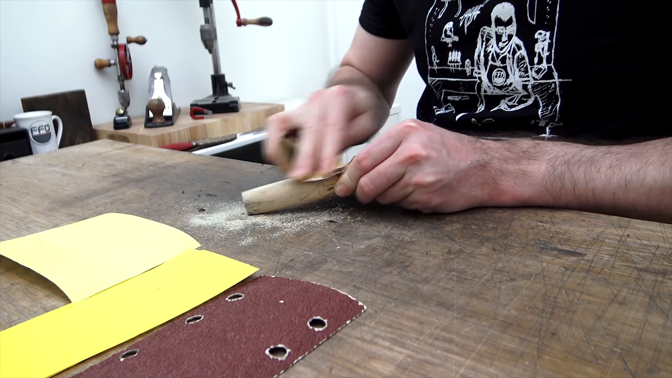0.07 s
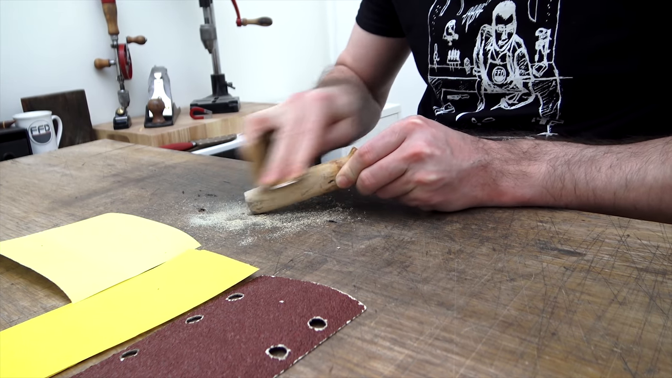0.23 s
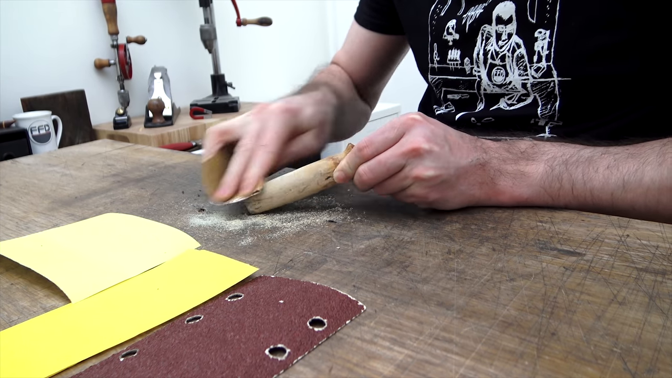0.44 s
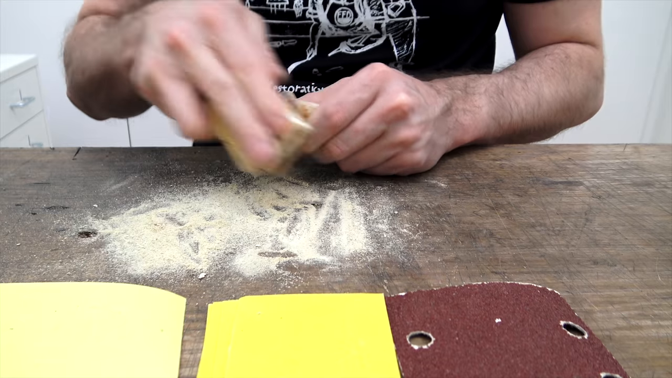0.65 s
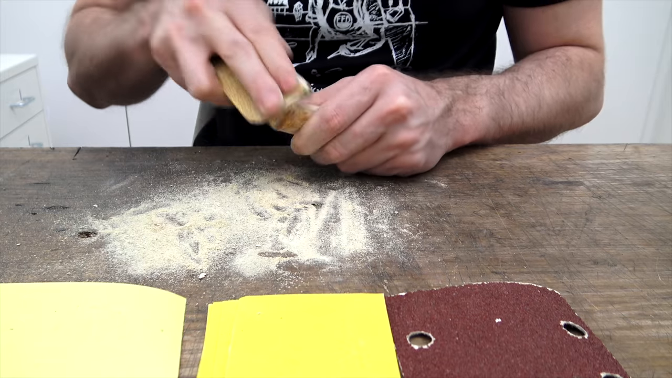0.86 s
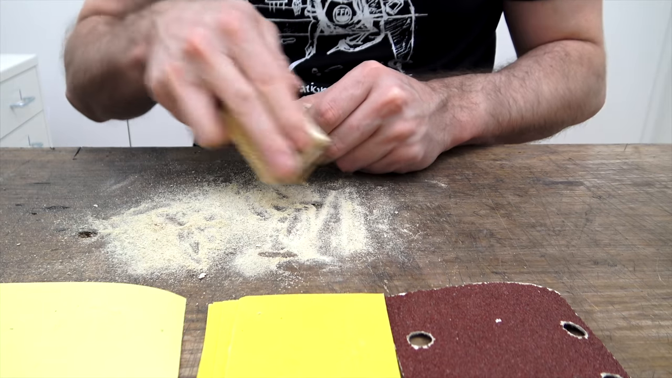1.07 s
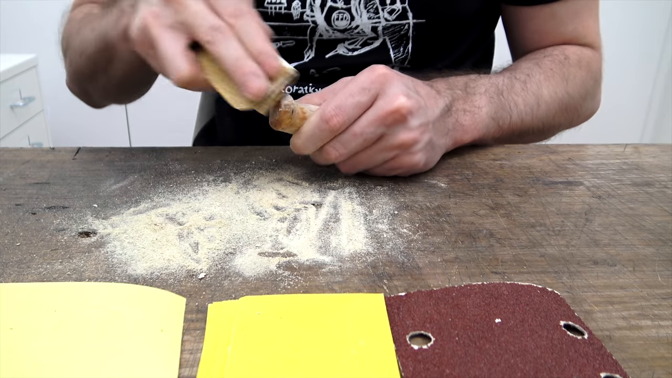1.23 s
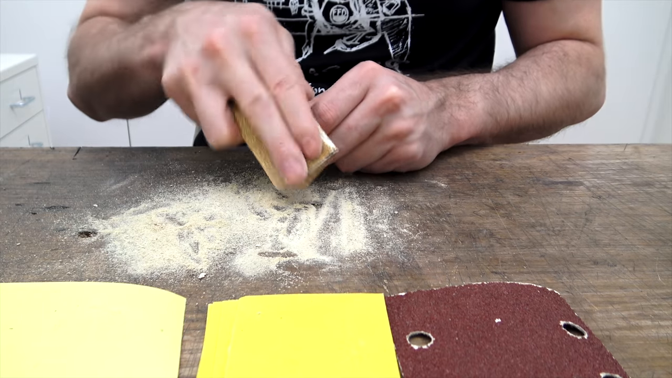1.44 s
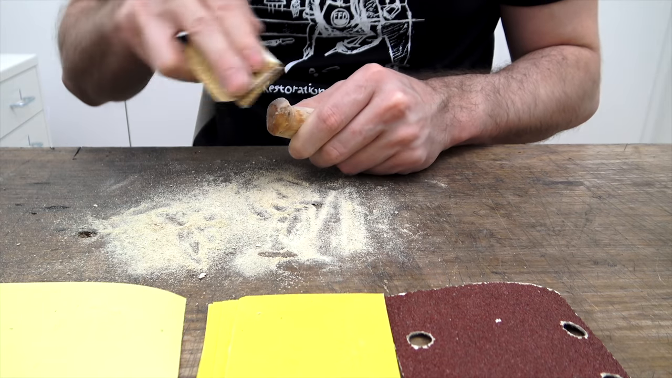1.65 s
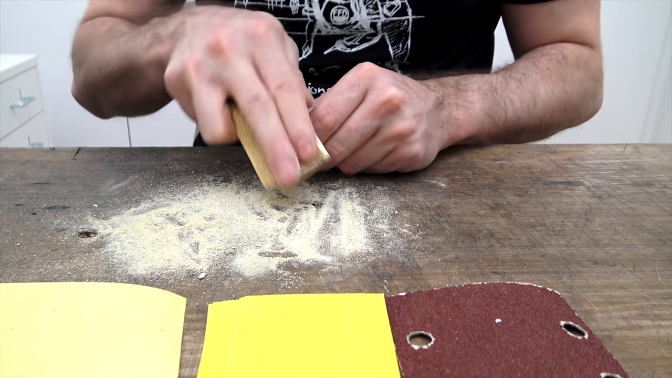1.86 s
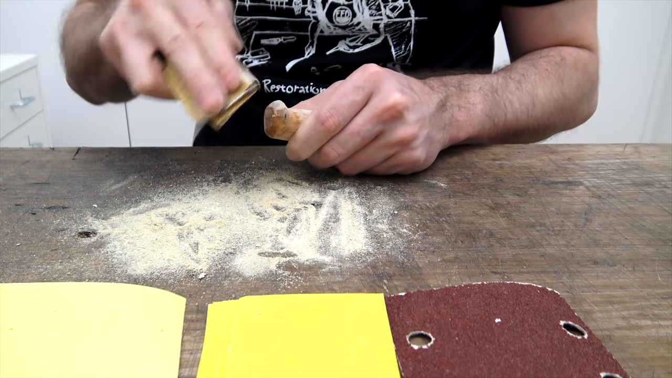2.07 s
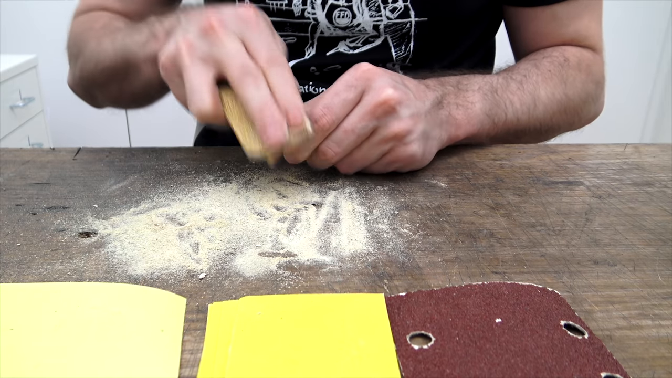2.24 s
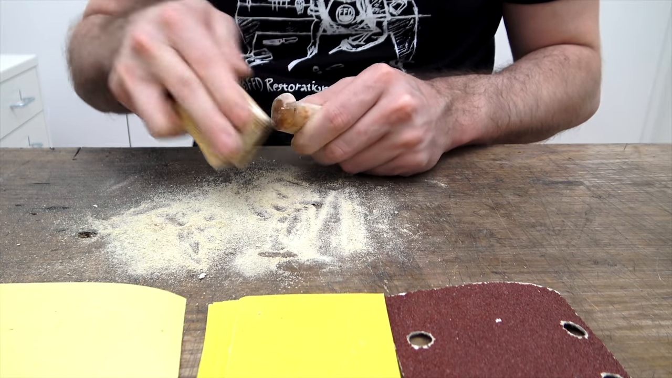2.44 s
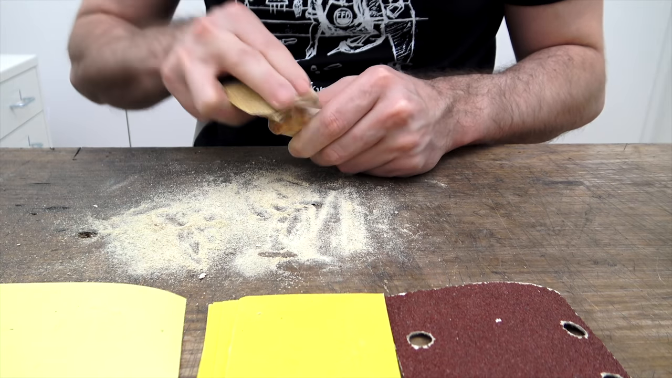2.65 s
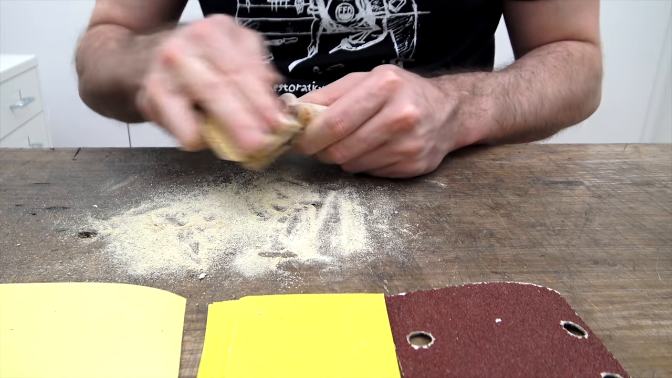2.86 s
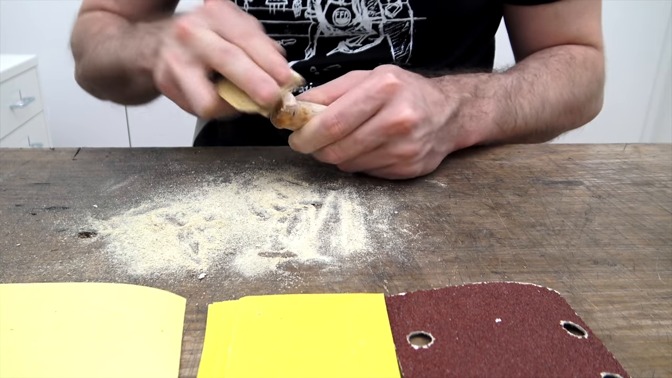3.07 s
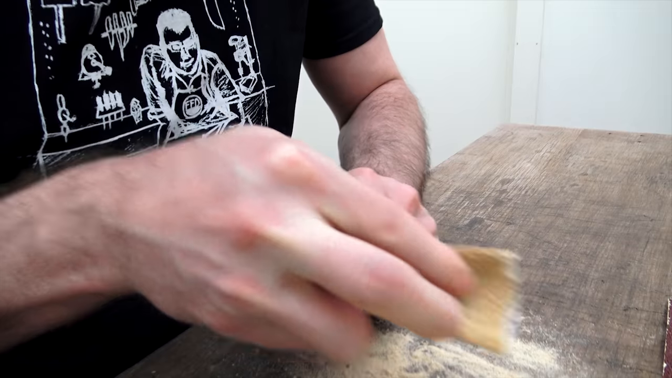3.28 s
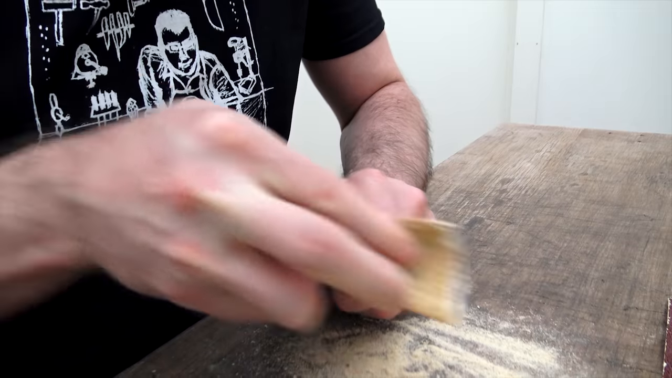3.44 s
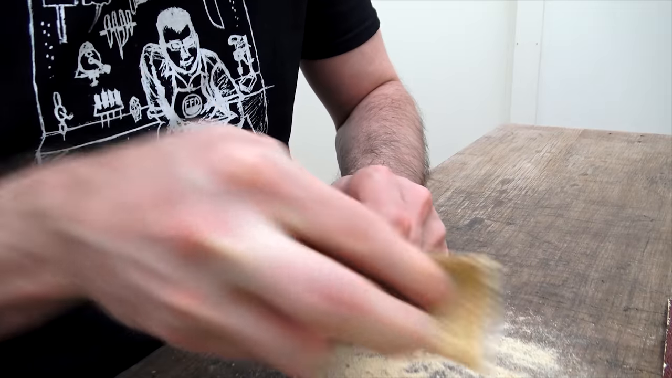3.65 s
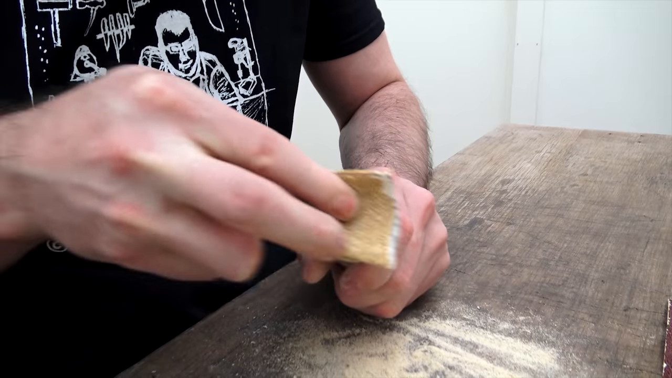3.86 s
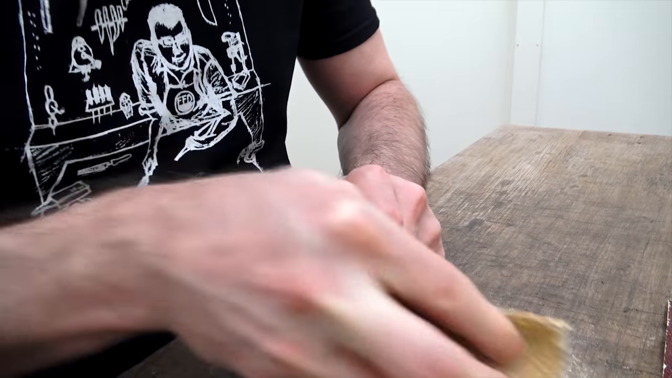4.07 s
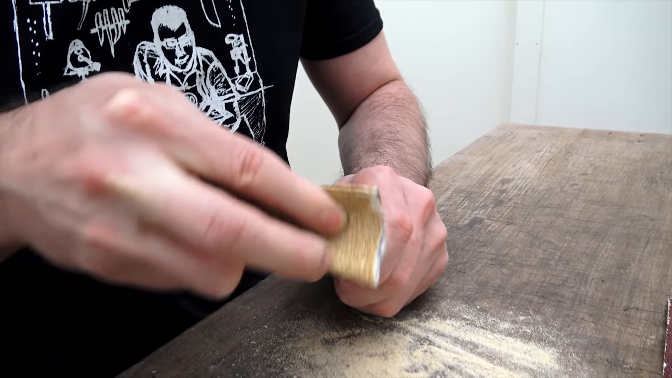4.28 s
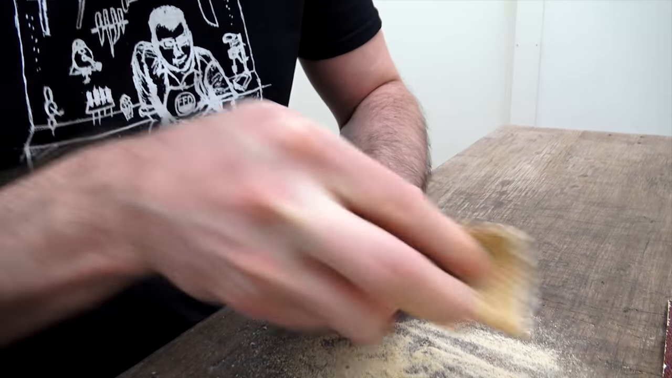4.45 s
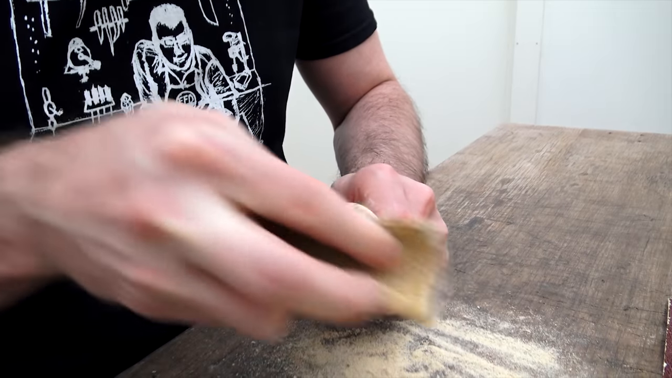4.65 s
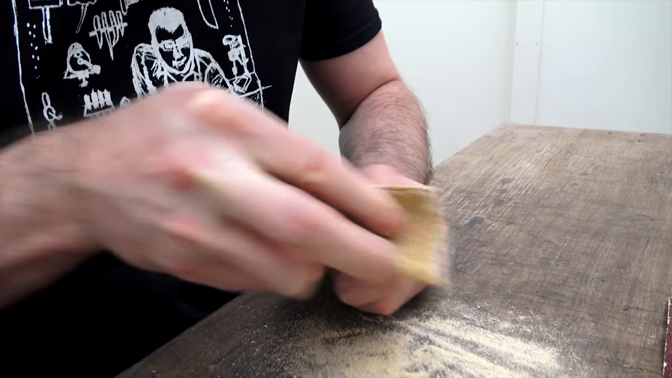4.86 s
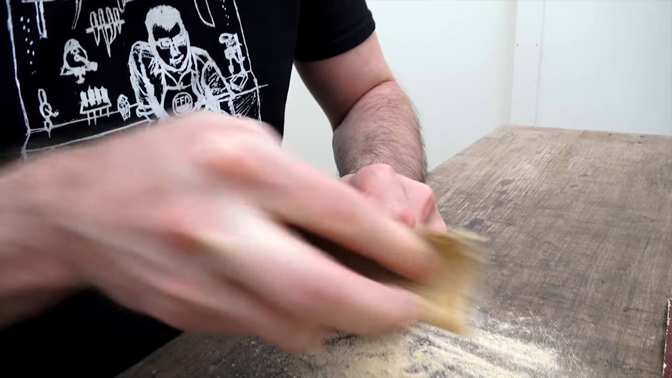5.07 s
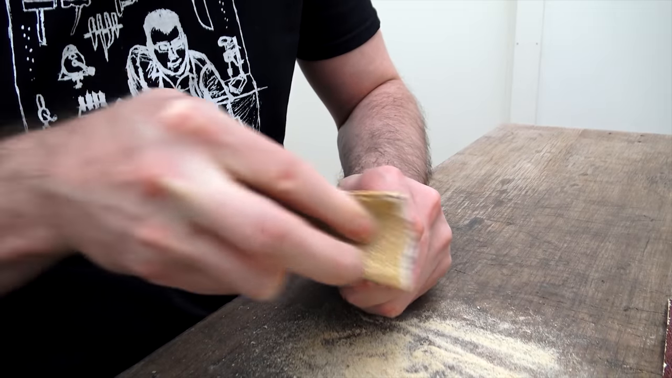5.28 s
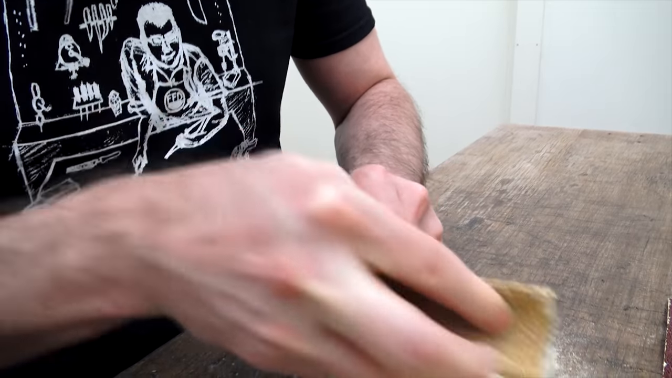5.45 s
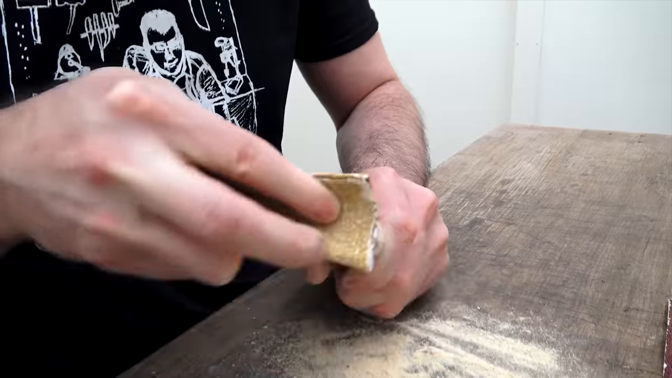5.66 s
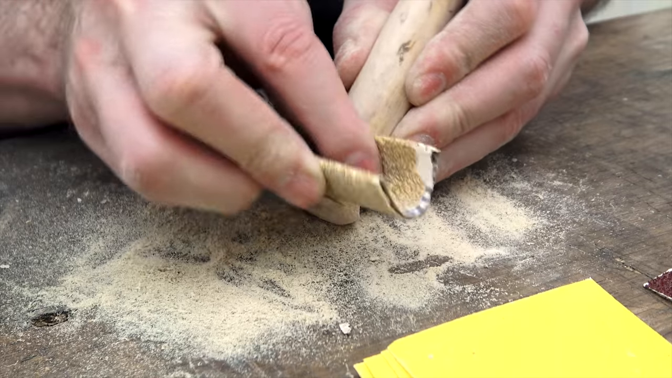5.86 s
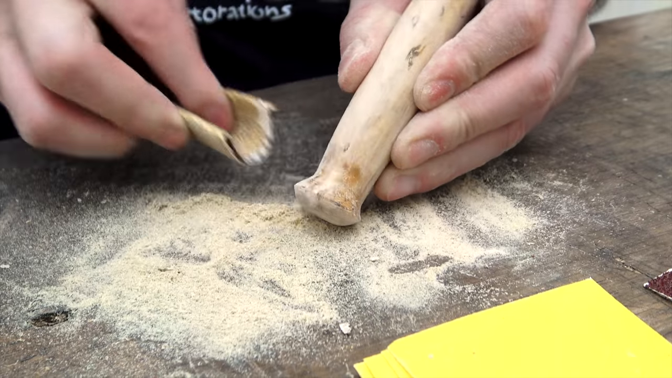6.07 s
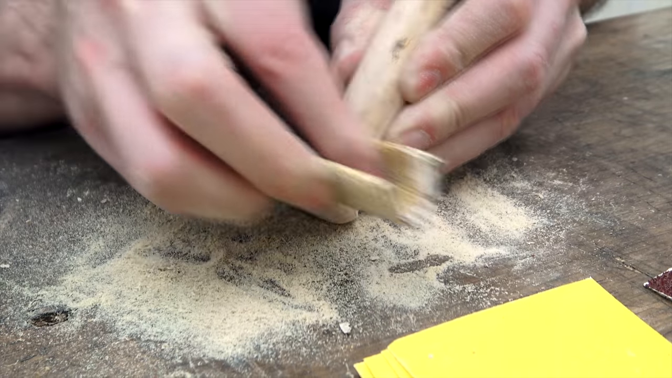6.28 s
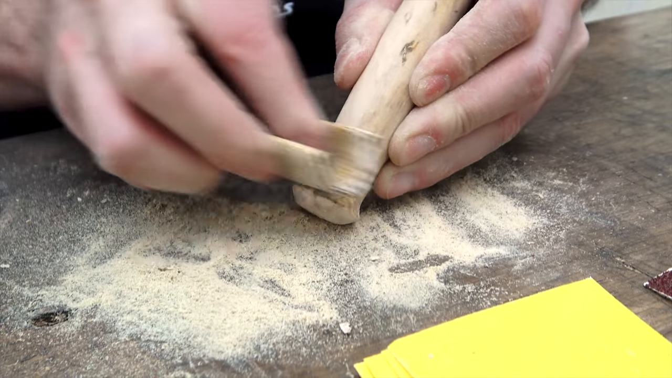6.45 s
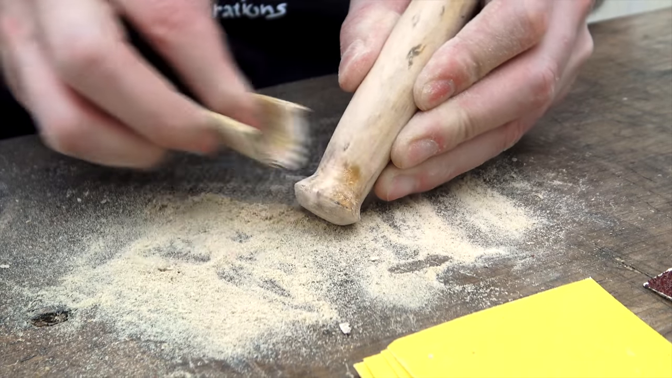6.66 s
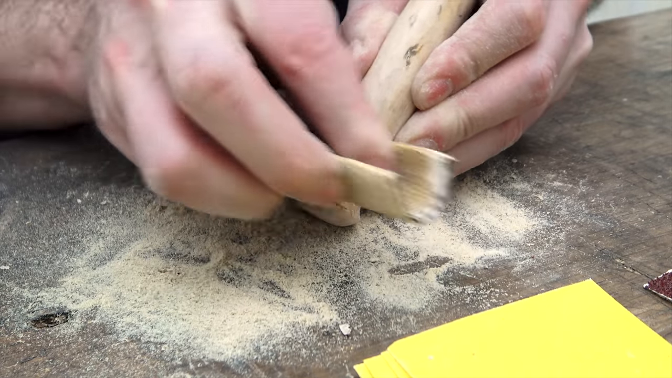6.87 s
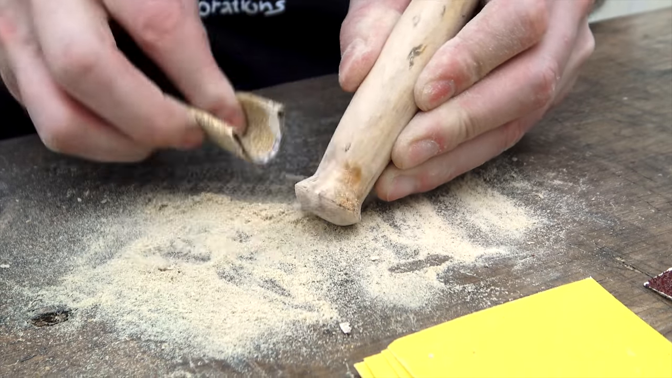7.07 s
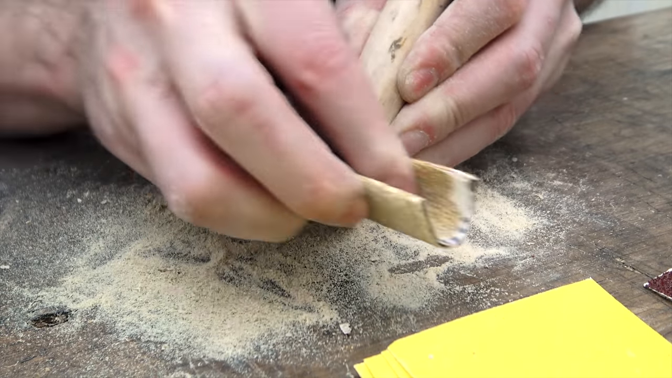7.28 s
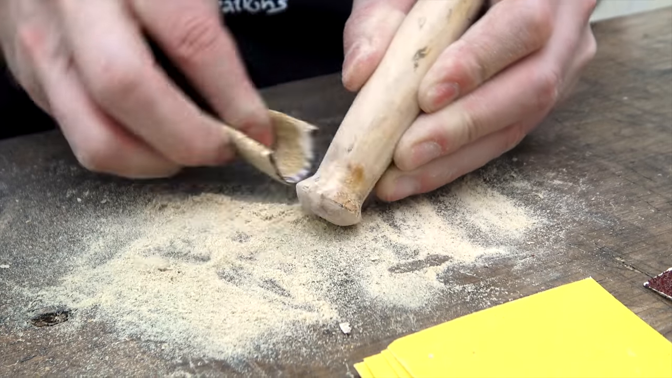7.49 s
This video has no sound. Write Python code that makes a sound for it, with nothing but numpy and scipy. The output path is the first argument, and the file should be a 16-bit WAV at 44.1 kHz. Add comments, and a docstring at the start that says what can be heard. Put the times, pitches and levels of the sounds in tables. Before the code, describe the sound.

Close, dry hand sanding of wood: a fast scratchy run, a low bump, then distinct gritty strokes with light slaps, snaps and short room echo.

```python
"""At a workbench in a bare room, a folded piece of sandpaper is rubbed by hand along a wooden handle in four
grips: quick passes along its side, then separate strokes on the rim, over the end and round the neck.
Random grit impacts hiss on the paper and rasp in the handle's resonances; noise in the bench modes rumbles.
Gliding noise bands make hoarse notes, noise bursts make snaps and slaps, decaying sines make low thuds.
Decaying noise tails ring on as the room, over a faint bed of still air."""
import sys
import numpy as np
from scipy import signal
from scipy.fft import rfft, irfft, next_fast_len
from scipy.io import wavfile
from scipy.ndimage import map_coordinates

SR = 44100
rng = np.random.default_rng(int(sys.argv[2]) if len(sys.argv) > 2 else 0)


def store_pcm(level_fs):
    """Save levels as 16-bit WAV."""
    pcm = np.round(np.clip(level_fs, -1, 1) * 32767).astype(np.int16)
    wavfile.write(sys.argv[1], SR, np.atleast_2d(pcm).T)


N = 331632  # length in samples
SIZE = next_fast_len(N + SR)  # filter length, padded so that tails do not wrap round
HZ = np.fft.rfftfreq(SIZE, 1 / SR)
TIME = np.arange(N) / SR


def amp(db):
    """Decibels to gain."""
    return 10 ** (np.asarray(db) / 20)


def unit(x):
    """Scale to rms 1."""
    return x / np.sqrt(np.mean(x ** 2) + 1e-20)


def along(points, hz=HZ):
    """Draw a curve through (Hz, value) points on a log frequency axis."""
    point_hz, values = np.transpose(points)
    return np.interp(np.log(hz + 1), np.log(point_hz + 1), values)


def below(edge_hz, order):
    """Share of the power that lies under a soft edge."""
    return 1 / (1 + (HZ / edge_hz) ** order)


def filtered(x, response):
    """Pass x through a frequency response."""
    return irfft(rfft(x, SIZE) * response, SIZE)[..., :N]


def causal(gain):
    """The minimum-phase response with this gain: it rings only after its cause."""
    cepstrum = irfft(np.log(np.maximum(gain, 1e-6)), SIZE)
    cepstrum[1:SIZE // 2] *= 2
    cepstrum[SIZE // 2 + 1:] = 0
    return np.exp(rfft(cepstrum))


def wobble(rate):
    """A smooth random curve, rate knots a second."""
    knots = rng.standard_normal(int(N * rate / SR) + 4)
    return map_coordinates(knots, [TIME * rate])


# How the strokes of each grip move. Each row: from and until in seconds, place of the hiss peak and of the
# rasp peak in the stroke (0-1, held just inside it), swell in dB, rasp over hiss in dB.
SIDE_MOTION = (-1, 0.58, .5, 1.3, 7, -1)
RIM_MOTION = (.57, 3.2, 0.53, 0.61, 21.4, 0.53)
END_MOTION = (3.2, 5.6, 0.26, 0.65, 12.8, 0.41)
NECK_MOTION = (5.5, 7.5, 0.5, 0.5, 10, -.5)
# Colour of the scratching in each grip. Each row: frequency in Hz, relative density in dB per Hz.
SIDE_COLOUR = [(350, -7.5), (550, -11.5), (850, -9.0), (1300, -5.5), (1900, -1.7), (2500, -1.5), (3300, -4),
               (5000, -1.5), (7500, -1.5), (11000, -4), (14000, -8), (16000, -10.5)]
RIM_COLOUR = [(350, -8.5), (550, -8.5), (850, -9), (1300, -2), (1900, 0.5), (2500, -0.5), (3300, 4),
              (5000, 2), (7500, -2), (11000, -5.5), (14000, -10), (16000, -20)]
END_COLOUR = [(350, -2.5), (550, -5), (850, -5), (1300, -1.5), (1900, -6.5), (2500, -1.5), (3300, 2.5),
              (5000, -2), (7500, -7), (11000, -10), (14000, -11.4), (16000, -23)]
NECK_COLOUR = [(350, -8), (550, -3.5), (850, -7.5), (1300, -4), (1900, -2), (2500, -1.5), (3300, -2.5),
               (5000, -2.5), (7500, -7), (11000, -7.5), (14000, -13), (16000, -21.5)]
# Resonances of handle, paper and cupped hand. Each row: centre in Hz, width in Hz, lift over the colour in dB.
SIDE_MODES = [(654, 110, 6.5), (1350, 36, 10), (1545, 160, 5), (1610, 47, 1), (2240, 97, 3.5)]
RIM_MODES = [(424.4, 16.5, 13.6), (610, 160, 8.1), (1947, 230, 6.8), (2206, 110, 3.8), (3050, 100, 3.1),
             (3400, 65, 1.1), (4430, 50, 2.8)]
END_MODES = [(451.5, 25, 5.4), (1340, 63, 2), (1500, 65, 3.3), (1775, 280, 10.2), (2860, 630, 3.8)]
NECK_MODES = [(540, 29, 8.1), (688, 170, 6.6), (748, 5.8, 2.4), (872, 26, 8.4), (1032, 234, 8.9),
              (1600, 410, 6.3), (4670, 330, 0.94)]
# Modes of the bench top. Each row: centre in Hz, width in Hz, then the relative drive in dB from the side,
# rim, end and neck grip.
BENCH_MODES = [(39.7, 10.3, 0, 1.5, 10, -6), (61.6, 14.5, -16, -2, -3, -4.5), (124, 17, -0.5, 1, -0.5, 2.5),
               (179.8, 4.5, -3, -8, -11.5, -8), (208.6, 14, -0.5, -9, -3.5, -1.5),
               (288, 30, -7, -10.5, 0.5, -16), (334, 41, -9.5, -15, -12.5, -28.5)]


def sanding(motion, colour, modes, bench_db):
    """One grip: grit hisses on the paper, rasps in the handle and shakes the bench under it."""
    hiss_gain, upper_gain, lower_gain, bench_gain = effort(motion)
    lifts = sum(lift / (1 + (2 * (HZ - hz) / width) ** 2) for hz, width, lift in modes)
    body = amp(along(colour) + lifts)
    wood_share, deep_share = below(5060, order=8), below(2280, order=6)
    paper = unit(body * np.sqrt(1 - wood_share))
    handle = unit(body * np.sqrt(wood_share) * (1 - below(329, order=6)))
    upper_handle = handle * np.sqrt(1 - deep_share)
    lower_handle = handle * np.sqrt(deep_share)

    # the paper sticks and slips, so the scratches come in clumps
    chatter = unit(amp(0.97 * wobble(rate=260) + 1.98 * wobble(rate=45)))
    hiss_grit = hiss_gain * chatter * scratches(per_second=10000, spread_db=5)
    hiss = filtered(hiss_grit, causal(paper))
    upper_grit = upper_gain * chatter * scratches(per_second=14000, spread_db=2.0)
    upper_rasp = filtered(upper_grit, causal(upper_handle))
    lower_grit = lower_gain * chatter * scratches(per_second=12000, spread_db=2.5)
    lower_rasp = filtered(lower_grit, causal(lower_handle))

    bench = 0
    for k, ((hz, width, *_), db) in enumerate(zip(BENCH_MODES, bench_db)):
        resonance = 1j * HZ * width / (hz ** 2 - HZ ** 2 + 1j * HZ * width)
        bench = bench + (-1) ** k * amp(db) * resonance  # neighbours in opposite polarity
    bench = bench / np.sqrt(np.mean(abs(bench) ** 2))
    rumble = filtered(bench_gain * rng.standard_normal(N), bench)
    return hiss + upper_rasp + lower_rasp + rumble


# Each push or pull of the paper. Each row: start in seconds, length in seconds, level in dB.
STROKES = [(-0.005, 0.13, -30), (0.127, .125, -29.5), (0.27, 0.11, -31.5), (0.394, 0.1, -30),
           (0.521, .11, -30), (0.624, .08, -42), (0.889, 0.16, -35.5), (1.005, .11, -36.5),
           (1.323, .18, -36), (1.444, 0.11, -36), (1.78, 0.22, -34), (2.215, 0.21, -35),
           (2.388, 0.097, -42.5), (2.671, 0.18, -34), (2.831, 0.087, -35), (3.117, .178, -32.5),
           (3.294, 0.052, -38.5), (3.366, 0.073, -30.5), (3.505, .16, -30.5), (3.994, 0.18, -28.5),
           (4.446, 0.17, -29), (4.898, 0.088, -30.5), (4.976, 0.1, -29.5), (5.344, 0.078, -34.5),
           (5.401, 0.14, -30), (5.771, .16, -35), (5.964, 0.13, -32), (6.27, 0.14, -33),
           (6.43, 0.16, -32.5), (6.76, 0.13, -33.5), (6.925, .15, -32), (7.229, .15, -34),
           (7.411, 0.18, -31.5)]
# How firmly the handle rests on the bench. Each row: time in seconds, rumble over the stroke level in dB.
BENCH_CONTACT = [(.5, -23), (.66, -4.5), (1, -8.5), (1.5, -5), (2.3, -5), (2.5, -11.5), (3.4, -18),
                 (5.45, -21), (5.8, -14.5), (6.85, -15.5), (7, -9.5), (7.3, -12)]


def effort(motion, edge=0.0067):
    """Gains of hiss, upper rasp, lower rasp and bench: hiss swells with speed, deeper layers with pressure."""
    from_s, until_s, hiss_place, rasp_place, swell_db, rasp_db = motion
    gains = np.zeros((4, N))

    def arch(u, place):
        """A swell in dB that reaches 0 at its place in the stroke."""
        peak = np.clip(place, 1e-2, 1 - 1e-2)
        return swell_db * (np.sin(np.pi * np.interp(u, [0, peak, 1], [0, .5, 1])) - 1)

    for s, length, db in STROKES:
        if not from_s <= s < until_s:
            continue
        now = (TIME > s) & (TIME < s + length)
        u = (TIME[now] - s) / length
        contact = np.clip(np.minimum(u, 1 - u) * length / edge, 0, 1)  # edge: fade in and out, s
        speed, pressure = arch(u, hiss_place), arch(u, rasp_place)
        upper_db = rasp_db + (speed + pressure) / 2
        lower_db = rasp_db + 0.64 * pressure
        bench_db = np.interp(s + length / 2, *np.transpose(BENCH_CONTACT)) + pressure
        gains[:, now] += contact * amp(db) * amp([speed, upper_db, lower_db, bench_db])
    return gains


def scratches(per_second, spread_db):
    """Tiny impacts of grit at random moments, with random sizes."""
    hit = rng.random(N) < per_second / SR
    grain = amp(spread_db * rng.uniform(-1.26, 1, N))
    return unit(hit * rng.standard_normal(N) * grain)


# The paper chatters into a hoarse note. Each row: start in seconds, length in seconds, final pitch in Hz,
# level in dB.
RASP_NOTES = [(.426, 0.14, 1560, -44.5), (1.888, .13, 450, -49), (2.403, 0.059, 1445, -45),
              (3.583, 0.077, 1780, -38), (4.06, 0.14, 1937, -35.5), (4.461, 0.11, 1775, -41),
              (5.432, 0.056, 994, -38), (5.452, .09, 1883, -34.5), (6.944, 0.06, 1066, -41),
              (7.259, 0.14, 1128, -41.5)]
NOTE_RISE = .2  # a note glides up from this share below its final pitch


def rasp_notes(blur_rate=260):
    """Half-regular slipping: a narrow band of noise that swells and glides."""
    voices = np.zeros(N)
    for s, length, final_hz, db in RASP_NOTES:
        u = np.clip((TIME - s) / length, 0, 1)
        now = (u > 0) & (u < 1)
        pitch_hz = final_hz * (1 - NOTE_RISE * (1 - u[now]))
        phase = 2 * np.pi * np.cumsum(pitch_hz) / SR
        # two random curves, blur_rate knots a second, blur the tone into a band
        where = [(TIME[now] - s) * blur_rate]
        a, b = (map_coordinates(knots, where, mode="wrap") for knots in rng.standard_normal((2, 2 ** 6)))
        swell = np.sqrt(np.sin(np.pi * u[now]))
        voices[now] += amp(db) * swell * (a * np.cos(phase) + b * np.sin(phase))
    return voices


# A coarse grain catches and snaps free. Each row: start in seconds, nominal peak in dB, band centre in Hz.
SNAGS = [(.622, -21.5, 8800), (.935, -20.5, 11000), (1.031, -23, 10000), (1.793, -22.5, 10700),
         (2.869, -27, 4800), (2.884, -32, 5270), (3.518, -19, 8000), (4.017, -14, 4500), (4.914, -18, 8200),
         (6.071, -22, 8040), (7.043, -16.5, 6900)]
SMALL_SNAG_DB, SMALL_SNAG_HZ = 8, 11000  # lesser snags: nominal peak over their stroke, middle of the centres
SMALL_SNAG_SPREAD = .35  # scatter round mid-stroke, share of its length


def snags():
    """Bright snaps, each in its own band: a few loud ones, and a lesser one somewhere in every stroke."""
    out = np.zeros(N + SR)
    t = np.arange(SR // 10) / SR
    chance = rng.uniform(-1.1, 1, (len(STROKES), 2))
    lesser = []
    for (s, length, db), (when, pitch) in zip(STROKES, chance):
        start = max(s + length * (.5 + SMALL_SNAG_SPREAD * when), 0)
        lesser.append((start, db + SMALL_SNAG_DB, SMALL_SNAG_HZ * 2 ** (pitch / 2)))
    for s, db, hz in SNAGS + lesser:
        band = signal.butter(1, [hz * .7, min(hz * 1.35, .45 * SR)], "bandpass", fs=SR)
        crack = unit(signal.lfilter(*band, rng.standard_normal(len(t))))
        # the noise starts with its rms 6.5 dB under the nominal peak
        out[round(s * SR):][:len(t)] += crack * amp(db - 6.5 - 60 * t / 0.028)
    return out[:N]


# The paper lands on the wood. Each row: start in seconds, nominal peak in dB.
LANDINGS = [(0.892, -37), (1.3339, -26.5), (1.7829, -24.5), (2.213, -26), (2.6776, -27.5), (3.118, -25.5),
            (3.3684, -16), (3.9595, -14.5), (4.4111, -15.5), (4.8683, -15.5), (5.3194, -19), (5.767, -28.5),
            (6.278, -26), (6.77, -17.5), (7.2427, -17)]
# Colour of the paper slap. Each row: frequency in Hz, relative density in dB per Hz.
SLAP_COLOUR = [(100, 3), (350, 1.5), (700, 4.5), (1200, -7), (1800, -0.5), (3200, -2), (4200, -2.5),
               (8000, -1.5), (16000, -14)]
KNOCK_DB = -20.5  # the handle's knock against the nominal peak of a landing


def landings():
    """The paper slaps the handle, which answers with a light, woody knock."""
    s, db = np.transpose(LANDINGS)
    slap = bursts(s, db - 11, t60=0.026, colour=SLAP_COLOUR)
    wood = [(40, -8.5), (150, -7), (350, -14.0), (700, -7.5), (1800, -9.5), (4000, -71)]
    knock = bursts(s, db + KNOCK_DB, t60=0.015, colour=wood)
    return slap + knock


def bursts(times, levels_db, t60, colour):
    """Short coloured noise bursts that fall by 60 dB in t60 seconds."""
    out = np.zeros(N + SR)
    t = np.arange(SR // 10) / SR
    for s, db in zip(times, levels_db):
        out[round(s * SR):][:len(t)] += amp(db - 60 * t / t60) * rng.standard_normal(len(t))
    return filtered(out[:N], causal(unit(amp(along(colour)))))


# Low thuds in the bench top: one bump at the change of grip, later shudders of rubbing strokes. Each row:
# start in seconds, level in dB, extra level of the modes under 100 Hz in dB.
THUDS = [(0.593, -36.5, -1), (1.901, -47, -11), (6.025, -45, -20), (6.494, -36.5, -18), (6.965, -39, -23),
         (7.462, -33.5, -20)]


def thuds():
    """Each thud rings all the bench modes as decaying sines; narrow modes last longest."""
    out = np.zeros(N)
    for s, db, deep_db in THUDS:
        t = np.maximum(TIME - s, 0)
        for hz, width, _, rim_db, *_ in BENCH_MODES:  # modes balanced as in the rim grip
            gain = amp(db + rim_db + deep_db * (hz < 100))
            out += gain * np.exp(-np.pi * width * t) * np.sin(2 * np.pi * hz * t)
    return out


def room(x, count=64):
    """The hands keep moving, so each stretch of sound meets the walls by new paths."""
    out = np.zeros(N + 2 * SR)
    for span in np.array_split(np.arange(N), count):
        answer = signal.fftconvolve(x[span], room_tail())
        out[span[0]:][:len(answer)] += answer
    return out[:N]


# How long the room rings. Each row: frequency in Hz, time to fall by 60 dB in seconds.
ROOM_DECAY = [(60, 0.27), (280, 0.41), (450, 0.44), (700, 0.38), (1400, 0.5), (1850, 0.55), (2300, 0.47),
              (4000, 0.55), (8000, 0.43), (15000, 0.21)]


def room_tail():
    """One diffuse answer of the room: noise that decays at its own rate in each band."""
    hz, t, z = signal.stft(rng.standard_normal(SR), SR, nperseg=512)
    decay = amp(-60 * t / along(ROOM_DECAY, hz)[:, None])
    tail = signal.istft(z * decay, SR, nperseg=512)[1]
    tail *= np.clip(np.arange(len(tail)) / SR / 0.004 - .5, 0, 1)  # the first walls answer a few ms late
    return tail / np.linalg.norm(tail)


# Colour of the still air. Each row: frequency in Hz, relative density in dB per Hz.
AIR_COLOUR = [(20, 0), (50, -1), (130, -5), (300, -4), (1000, -2), (4000, -19), (16000, -17.5)]


def still_air():
    """A faint, steady bed of coloured noise."""
    return amp(-65.0) * unit(filtered(rng.standard_normal(N), amp(along(AIR_COLOUR))))


# Side level. Each row: frequency in Hz, gain in dB of a second diffuse tail that spreads left and right.
SIDE_LEVEL = [(50, -36), (125, -19), (400, -17.5), (1200, -34.5), (2500, -70), (4500, -33), (7500, -11.5),
              (14000, -19)]


def scene():
    """All four grips in the room, heard close and nearly mono."""
    side_db, rim_db, end_db, neck_db = np.transpose(BENCH_MODES)[2:]
    direct = sanding(SIDE_MOTION, SIDE_COLOUR, SIDE_MODES, side_db)
    direct += sanding(RIM_MOTION, RIM_COLOUR, RIM_MODES, rim_db)
    direct += sanding(END_MOTION, END_COLOUR, END_MODES, end_db)
    direct += sanding(NECK_MOTION, NECK_COLOUR, NECK_MODES, neck_db)
    direct += rasp_notes() + snags() + landings() + thuds()
    mid = direct + amp(-3.5) * room(direct) + still_air()
    side = filtered(room(direct), amp(along(SIDE_LEVEL)))
    # the bench sounds from the left: (Hz, share of mid added left and taken right)
    lean_share = [(40, 0.043), (120, 0.21), (280, 0.0054), (600, .005), (1200, 0.11), (3000, 0.0021)]
    lean = filtered(mid, along(lean_share))
    return np.array([mid + side + lean, mid - side - lean])


def record(dry):
    """Limit the band: a steep slope under about 32 Hz and nothing from 15950 Hz up."""
    return filtered(dry, (HZ < 15950) * (1 - below(32, order=14)))


dry = scene()
out = record(dry)
store_pcm(out)
```